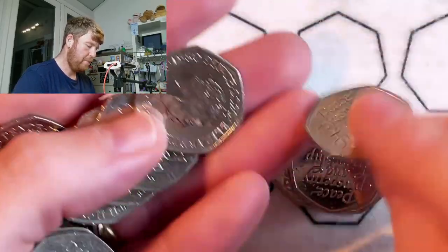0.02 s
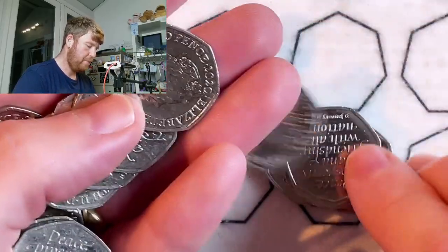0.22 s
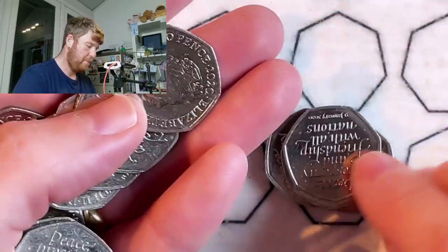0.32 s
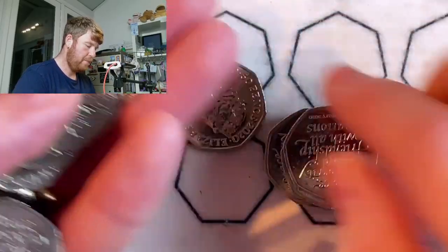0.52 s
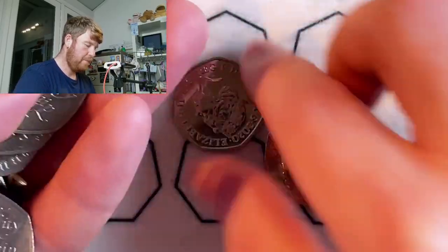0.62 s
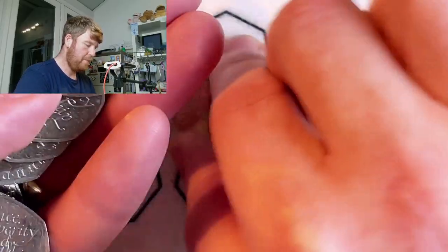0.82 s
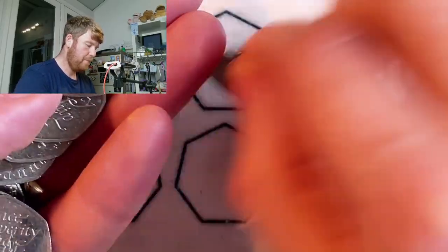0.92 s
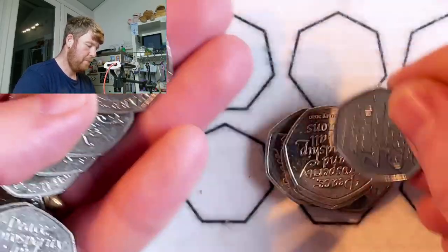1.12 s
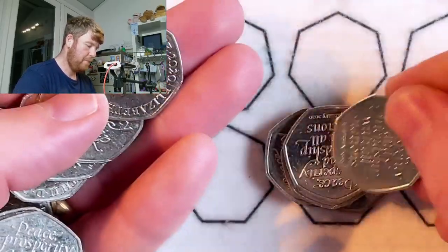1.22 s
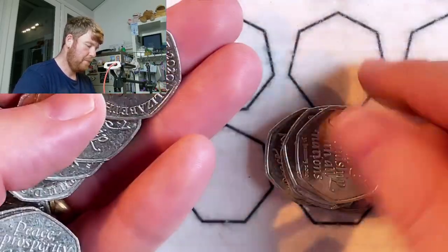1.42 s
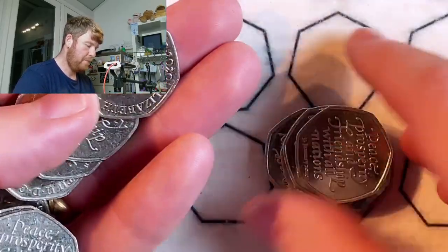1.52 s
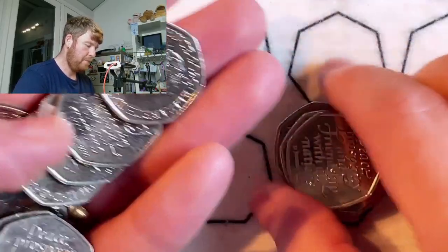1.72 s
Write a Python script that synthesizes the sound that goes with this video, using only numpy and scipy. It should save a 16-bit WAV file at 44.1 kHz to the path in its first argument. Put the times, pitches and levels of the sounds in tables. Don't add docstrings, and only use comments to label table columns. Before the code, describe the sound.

Coins drop onto a stack on a paper-covered desk with sharp, bright chattering clinks and light thuds, then fingers tick on the paper, a held coin clicks, and another coin lands; close microphone, quiet room.

```python
import sys
import numpy as np
from scipy import signal
from scipy.io import wavfile
from scipy.ndimage import uniform_filter1d

SR = 44100
rng = np.random.default_rng(int(sys.argv[2]) if len(sys.argv) > 2 else 0)


def digitize_waveform(pressure):
    field = np.atleast_2d(pressure).T
    bounded = np.clip(field, -1, 1)
    quanta = np.round(bounded * 32767).astype(np.int16)
    wavfile.write(sys.argv[1], SR, quanta)


def natural_amplitude(level_db):
    exponent = np.asarray(level_db, float) / 20
    return 10 ** exponent


N = 77175


def evened(x):
    return x / np.sqrt(np.mean(x ** 2) + 1e-20)


def unit(x):
    return x / np.linalg.norm(x)


def read(points, hz):
    f, value = np.transpose(points)
    return np.interp(np.log(hz + 1), np.log(f + 1), value)


def add(mix, s, sound):
    part = mix[round(s * SR):][:len(sound)]
    part += sound[:len(part)]


def smooth_noise(samples, passes=1):
    drift = rng.standard_normal(N)
    for _ in range(passes):
        drift = uniform_filter1d(drift, size=samples)
    return evened(drift)


def colour(points):
    log_gain = np.log(natural_amplitude(read(points, np.fft.rfftfreq(2048, 1 / SR))))
    full = signal.hilbert(np.r_[log_gain, log_gain[-2:0:-1]])
    return unit(np.fft.ifft(np.exp(np.conj(full))).real[:1024])


def level(curve):
    s, db = np.transpose(curve)
    t = np.arange(N) / SR
    inside = np.clip(np.minimum(t - s[0], s[-1] - t) / 0.016 + 1, 0, 1)
    return natural_amplitude(np.interp(t, s, db)) * inside


def grains(per_s, spread_db):
    size = natural_amplitude(spread_db * np.minimum(rng.exponential(1, N), 4)) * rng.choice([-1., 1.], N)
    return evened(size * (rng.random(N) < per_s / SR))


DAMPED_T60_S = 0.0064


def ring(modes, t, free_s, start_s=0):
    out = 0
    for (hz, db, t60_s), (a, b) in zip(modes, rng.standard_normal((len(modes), 2))):
        phase_s = (1 + 0.00035 * b) * t + start_s
        out = out + natural_amplitude(db + a - 60 * t / t60_s) * np.sin(2 * np.pi * hz * phase_s)
    return out * natural_amplitude(-60 * np.maximum(t - free_s, 0) / DAMPED_T60_S)


# frequency in Hz, level in dB.
AIR = [(18, -34.5), (45, -4), (283, -9.5), (350, -13.5), (904, -19), (3660, -18.5), (5030, -26.5),
       (15200, -37), (16500, -49.5)]
AIR_DB, PATCH_DB = -62.5, 1.4


def air():
    frames, hz = N // 256 + 5, np.fft.rfftfreq(1024, 1 / SR)
    a, b, patches = rng.standard_normal((frames, 513, 3)).T
    patches = uniform_filter1d(patches, size=14, axis=0)
    patches = evened(uniform_filter1d(patches, size=8, axis=1))
    z = (a + 1j * b) * natural_amplitude(read(AIR, hz)[:, None] + PATCH_DB * patches)
    return natural_amplitude(AIR_DB) * evened(signal.istft(z, nperseg=1024, noverlap=768)[1][:N])


# start in seconds, high ring in dB, low ring in dB, seconds free until a touch damps it.
LANDING_RINGS = [(.2138, -17.5, -26, .005), (.2195, -22, -26.5, .008), (.228, -21.5, -31, 0.0092),
                 (.2475, -24.5, -34.5, 0.0039)]
STACK_RINGS = [(0, -57, -54, 0.084), (.185, -65, -64, 0.015), (.2722, -20, -23, 0.0025),
               (.276, -17, -23, 0.0043), (.283, -22, -24.5, 0.0076), (.2921, -13.5, -26, 0.0084),
               (.3006, -15.5, -25, 0.006), (.309, -27, -34, 0.0053), (.315, -35, -38.5, 0.031),
               (.3497, -17, -30, 0.0018), (.352, -18, -28, 0.006), (.36, -20, -29, 0.0062),
               (.3685, -23, -35, .003), (.373, -22.5, -40.5, 0.0077), (.381, -27, -40, 0.0047),
               (.391, -31.5, -48, 0.026), (.42, -47, -51.5, 0.046), (.47, -53, -53.5, 0.044),
               (1.4085, -40, -44, 0.0031), (1.415, -40, -46.5, 0.019), (1.4335, -17, -30, 0.0048),
               (1.439, -22, -28, 0.0057), (1.445, -28, -33, 0.0046), (1.451, -24, -35.5, 0.0047),
               (1.458, -33, -43, 0.0072), (1.47, -45, -51, .03)]
# frequency in Hz, level in dB, t60 in seconds.
LANDING_HIGH = [(14440, 0, .14), (14350, -8, .1), (14560, -12, .07)]
LANDING_LOW = [(8533, 0, .15), (8750, -5, .1), (9679, -6, .08)]
STACK_HIGH = [(14200, 0, .15), (14450, -9, .06), (14580, -13, .05), (14790, -17, .04)]
STACK_LOW = [(8355, 0, .14), (8575, -2, .2), (8790, -4, .07), (9175, -6, .08)]
RING_RISE_S, FLUTTER_DB = 0.0006, 1.6


def disc_rings():
    out, t = np.zeros(N), np.arange(9000) / SR
    rise = np.minimum(t / RING_RISE_S, 1)
    for rows, high_modes, low_modes in ((LANDING_RINGS, LANDING_HIGH, LANDING_LOW),
                                        (STACK_RINGS, STACK_HIGH, STACK_LOW)):
        for s, high_db, low_db, free_s in rows:
            high = natural_amplitude(high_db) * ring(high_modes, t, free_s, s)
            low = natural_amplitude(low_db) * ring(low_modes, t, free_s, s)
            add(out, s, rise * (high + low))
    return out * natural_amplitude(FLUTTER_DB * smooth_noise(200, passes=2))


# start in seconds, peak in dB, decay in seconds, brightness in dB.
COIN_CONTACTS = [(0.2136, -7, 0.0029, -2), (0.2202, -22.5, 0.0067, 5.5), (0.2269, -29, 0.011, 16.5),
                 (0.241, -26.5, 0.01, 4), (0.2468, -16, 0.0026, 10), (0.245, -24.5, 0.0087, 1.5),
                 (0.2729, -15.5, 0.0042, 8), (0.277, -18, 0.012, -3), (0.2833, -26.5, 0.011, 2),
                 (0.2932, -19.5, 0.002, -1.5), (0.2997, -19.5, 0.0093, -5), (0.3043, -24, 0.005, -2.5),
                 (0.311, -38, 0.011, 1), (0.3492, -13, 0.0025, 7), (0.3535, -14.5, 0.0011, 9),
                 (0.3654, -30.5, 0.017, 8), (0.3752, -27, 0.0025, -10.5), (0.392, -29, 0.0017, -5.5),
                 (0.413, -34.5, 0.0027, 1), (1.4091, -32.5, 0.0022, 5), (1.422, -44, 0.0057, 5),
                 (1.4323, -18.5, 0.007, -5), (1.451, -21.5, 0.0031, 3), (1.465, -37, 0.006, 5),
                 (0, -49, 0.05, -19),
    (0.26, -26.5, 0.008, 4),
    (.322, -41, 0.01, 9),
    (0.359, -30, 0.011, 15),
    (1.053, -67.5, 0.027, 12),
    (1.308, -44, 0.023, -16),
    (1.396, -42, 0.0048, 2),
    (1.419, -39, 0.019, -4.5),
    (1.44, -33, 0.0034, 5),
    (1.71, -47.5, 0.0061, -23),
]
# start in seconds, peak in dB, decay in seconds.
HELD = [(0.166, -52.5, 0.0037), (0.5186, -35, 0.0021), (1.3017, -26, 0.0027), (1.3067, -32.5, 0.0025),
        (1.3265, -43, 0.0049), (1.3539, -40, 0.0076), (1.363, -39, 0.0083), (1.378, -35, 0.0034),
        (1.3869, -33.5, 0.0033), (1.679, -53, 0.0037), (1.6836, -40.5, 0.002), (1.6865, -44.5, 0.0038),
        (1.6963, -44, 0.0027), (1.6994, -40, 0.0028), (1.703, -30, 0.0021), (1.726, -39, 0.0025),
        (1.7299, -38, 0.00098), (1.7314, -27, 0.005), (1.738, -33.5, 0.005), (1.7445, -43, .002),
        (1.7466, -32, 0.004)]
# frequency in Hz, level in dB.
CRACK = [(500, -49.5), (1000, -30.5), (2800, -14.5), (4600, -7.5), (6500, -11), (11500, -8), (13000, -28.5),
         (15500, -10.5), (16600, -49.5)]
# frequency in Hz, level in dB, t60 in seconds.
LANDING = [(3100, -18, .02), (3620, 0, .02), (4040, 3, .03), (4850, 5.5, .04), (5240, -7.5, .03),
           (6640, 1.5, 0.034), (10030, -6.5, 0.022), (11200, 0.5, .03)]
BODY = [(2397, -2, 0.031), (3790, -0.5, 0.047), (4200, 7.5, 0.038), (4600, 2, 0.05), (5210, -4, 0.033),
        (5660, -2.5, 0.033), (6540, 1, 0.029), (7380, -9, 0.058)]
PRESSED = [(9250, -9.5, 0.081), (9534, -3.5, 0.01), (10100, -6.5, 0.017), (11080, -7, 0.017),
           (14430, 9, 0.0048), (15700, -12, 0.011)]
HELD_BRIGHT_DB, LANDED_S = 3.5, 0.265
KNOCKS_PER_S, KNOCK_RISE_S, KNOCK_DB = 6000, 0.00028, -9.5
BODY_DB, PRESSED_DB, GRIP_DB, GRIP_SHIFT = -9, -5.5, 6, 0.0087


def gripped(modes, t):
    shifted = []
    for (hz, db, t60_s), (a, b) in zip(modes, rng.standard_normal((len(modes), 2))):
        shifted.append((hz * (1 + GRIP_SHIFT * a), db + GRIP_DB * b, t60_s))
    return unit(ring(shifted, t, 1))


def contacts():
    out, t, crack = np.zeros(N), np.arange(9000) / SR, colour(CRACK)
    for s, db, decay_s, bright_db in COIN_CONTACTS + [(*row, HELD_BRIGHT_DB) for row in HELD]:
        knocks = 0.5 + (rng.random(9000) < KNOCKS_PER_S / SR)
        hits = natural_amplitude(db + KNOCK_DB) * 1.998 * rng.standard_normal(9000) * knocks
        hits *= (1 - np.exp(-t / KNOCK_RISE_S)) * np.exp(-t / max(decay_s, 0.001))
        body = natural_amplitude(BODY_DB) * gripped(LANDING if s < LANDED_S else BODY, t[:1024])
        pressed = natural_amplitude(bright_db + PRESSED_DB) * gripped(PRESSED, t[:1024])
        add(out, s, signal.oaconvolve(hits, crack + body + pressed))
    return out


# frequency in Hz, t60 in seconds.
ROOM = [(300, .4), (3000, 0.46), (9000, 0.4), (14000, 0.27)]
ROOM_DB, RING_WET_DB = -17.5, -8


def room(x):
    taps = np.zeros(SR // 2)
    at = np.arange(160, SR // 2 - 20, 20)
    taps[at + rng.integers(0, 20, len(at))] = rng.choice([-1., 1.], len(at))
    hz, t, z = signal.stft(taps, SR, nperseg=256)
    tail = signal.istft(z * natural_amplitude(-60 * t / read(ROOM, hz)[:, None]), SR, nperseg=256)[1]
    return signal.fftconvolve(x, unit(tail))[:len(x)]


# start in seconds, level in dB, pitch in Hz.
THUDS = [(0.2166, -23.5, 228.5), (.257, -34, 247), (.279, -35, 247), (0.304, -38, 234), (0.3449, -33, 356),
         (0.351, -36, 203), (.369, -45, 238.8), (.388, -36, 236), (0.928, -48, 240), (1.0797, -46, 307),
         (1.087, -51, 110.5), (1.114, -47, 144.4), (1.15, -49, 203.5), (1.167, -51, 110), (1.298, -55, 304),
         (1.436, -41, 206), (1.445, -45.5, 113)]
# frequency in Hz, level in dB, t60 in seconds.
DESK = [(132, -16, 0.057), (209.8, -4, 0.27), (260, -5, 0.21), (331.5, -2, 0.2), (580, 3.5, 0.027)]
THUD_DB, THUD_T60_S, THUD_SAG, DESK_DB = 5.5, 0.029, 0.21, -19


def desk():
    out, t = np.zeros(N), np.arange(12000) / SR
    sag_s = THUD_SAG * 0.0029 * (1 - np.exp(-t / 0.004))
    push_envelope = (1 - np.exp(-t / 0.0019)) * natural_amplitude(-60 * t / THUD_T60_S)
    board_rise = 1 - np.exp(-t / 0.0043)
    for s, db, hz in THUDS:
        push = np.sin(2 * np.pi * hz * (t + sag_s)) * push_envelope
        board = natural_amplitude(DESK_DB) * board_rise * ring(DESK, t, 1)
        add(out, s, natural_amplitude(db + THUD_DB) * (push + board))
    return out


# start in seconds, level in dB, pitch in Hz, length in ms.
TICKS = [(0.52, -34, 4760, 0.83), (0.5941, -39, 1600, 0.76), (0.595, -37.5, 3200, 0.59),
         (0.6292, -40, 1530, 0.67), (0.6838, -44, 4200, .8), (0.699, -33.5, 1870, 1.6),
         (0.7052, -42, 5500, 0.23), (0.7593, -27.5, 4200, 1.1), (.7871, -36, 1970, 1.7),
         (0.799, -36.5, 3470, 0.76), (0.8198, -35.5, 3620, 1.4), (0.9264, -49.5, 2670, 0.86),
         (.955, -53, 9000, 0.66), (1.0785, -41.5, 797, 1.2), (1.1154, -39.5, 3740, 1.9),
         (1.1997, -38.5, 1900, 2.5), (1.2016, -43, 4500, 2)]
# frequency in Hz, level in dB.
TICK = [(400, -25), (1400, 0.5), (4500, 6.5), (7000, -3.5), (16000, -17.5)]
PAPER = [(400, -24), (1500, -5.5), (3500, -1), (6000, -5.5), (16000, -18)]
# time in seconds, level in dB.
RUSTLE = [(.5, -63.5), (.57, -58.5), (.64, -61.5), (.7, -69.5), (.8, -64.5), (1.0, -85.5), (1.14, -68.5),
          (1.3, -73)]
TICK_LATE_S, TICK_TAIL, NOTE_CYCLES = 0.0002, 5, 1.3
TICK_DB, NOTE_DB = 5, 5.5


def paper():
    out, t, tick = np.zeros(N), np.arange(700) / SR, colour(TICK)
    for s, db, hz, length_ms in TICKS:
        decay = np.exp(-1000 * t / length_ms) + 0.52 * np.exp(-1000 * t / length_ms / TICK_TAIL)
        hits = unit((rng.standard_normal(700) + 5 * (t == 0)) * decay)
        note = unit(np.sin(2 * np.pi * hz * t) * np.exp(-t * hz / NOTE_CYCLES))
        add(out, s + TICK_LATE_S, natural_amplitude(db + TICK_DB) * np.convolve(hits, tick))
        add(out, s + TICK_LATE_S, natural_amplitude(db + NOTE_DB) * np.convolve(hits, note))
    rustle = signal.oaconvolve(grains(8000, 2.17), colour(PAPER))[:N]
    return out + rustle * level(RUSTLE)


# time in seconds, level in dB.
HUM = [(.6, -89), (.8, -67), (1.15, -72), (1.25, -76), (1.4, -65), (1.6, -75), (1.7, -80.5)]


def drone():
    hz = 50.5 + 2.52 * smooth_noise(4000)
    return level(HUM) * np.sqrt(2) * np.sin(2 * np.pi * np.cumsum(hz) / SR)


# time in seconds, level in dB.
HAND = [(1.08, -80), (1.13, -62), (1.27, -73)]
# frequency in Hz, level in dB, t60 in seconds.
SKIN = [(333, -6, 0.031), (773, -3, 0.037), (1100, -2, 0.033)]


def hand():
    drag = colour([(250, -6), (600, 4.5), (1100, 1.5), (2200, 2.5), (8000, -67)])
    hollows = natural_amplitude(-2.5) * unit(ring(SKIN, np.arange(1024) / SR, 1))
    return level(HAND) * evened(signal.oaconvolve(grains(3000, 1.9), drag + hollows)[:N])


def scene():
    near, rings = contacts() + paper() + hand(), disc_rings()
    wet = natural_amplitude(ROOM_DB) * room(near + natural_amplitude(RING_WET_DB) * rings)
    return (near + rings + wet + desk() + air() + drone())[None]


def band_limit(x):
    return signal.sosfilt(signal.butter(12, 16660, fs=SR, output="sos"), x)


def record(dry):
    edge = signal.firwin(255, 15900, window=("kaiser", 6), fs=SR)
    return band_limit(signal.oaconvolve(dry, edge[None], "same"))


dry = scene()
out = record(dry)
digitize_waveform(out)
```